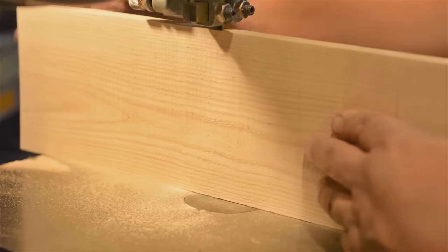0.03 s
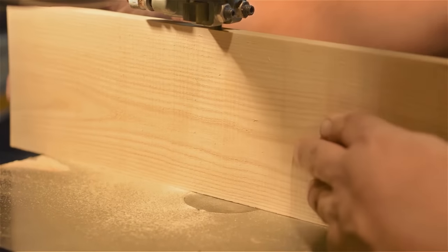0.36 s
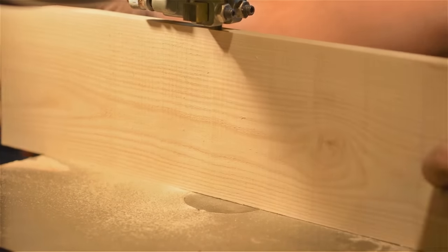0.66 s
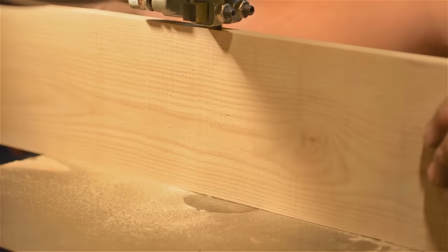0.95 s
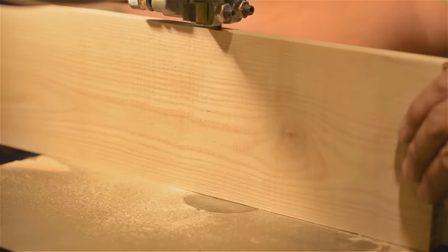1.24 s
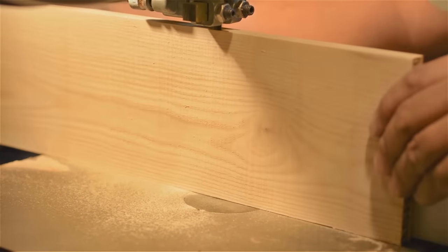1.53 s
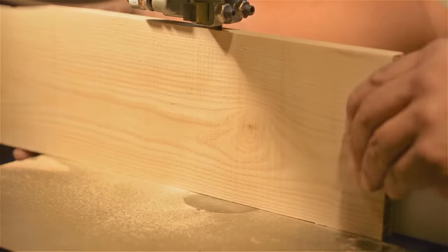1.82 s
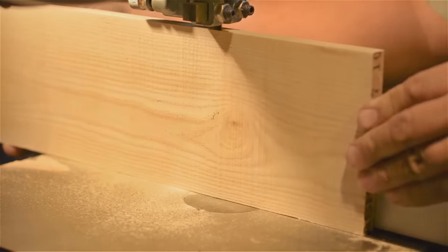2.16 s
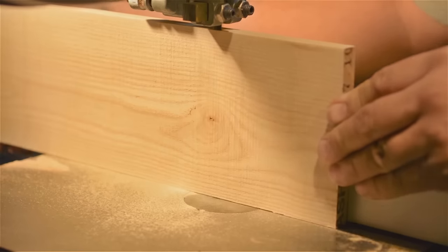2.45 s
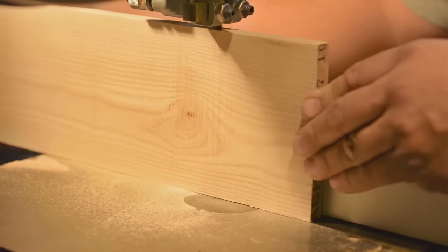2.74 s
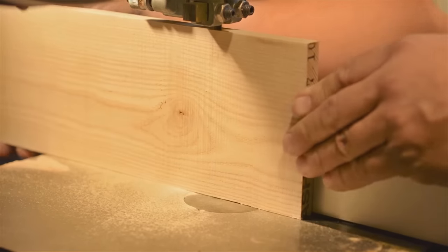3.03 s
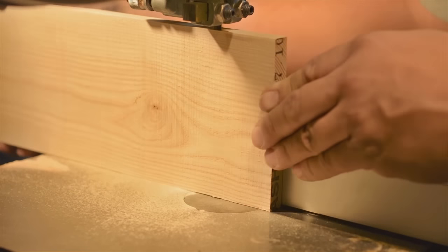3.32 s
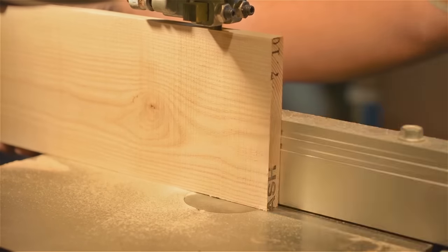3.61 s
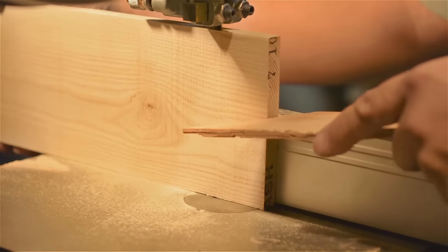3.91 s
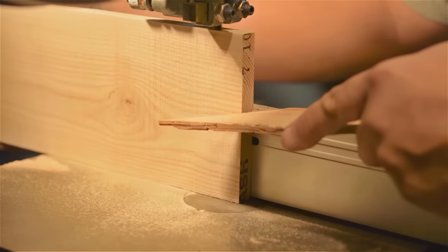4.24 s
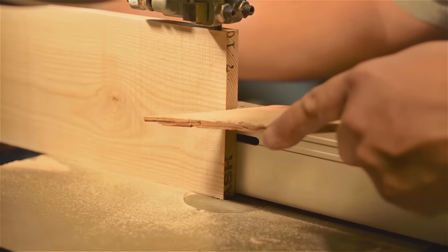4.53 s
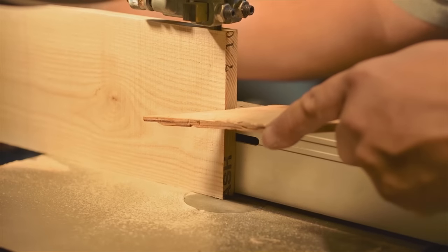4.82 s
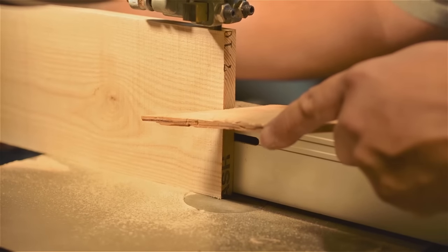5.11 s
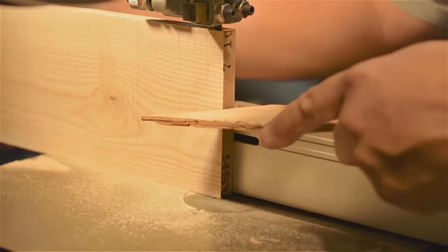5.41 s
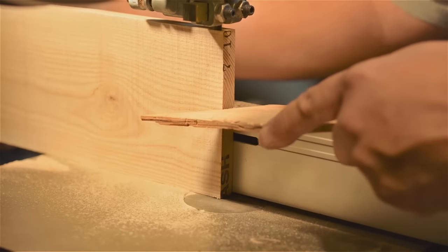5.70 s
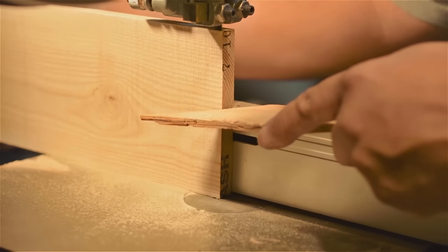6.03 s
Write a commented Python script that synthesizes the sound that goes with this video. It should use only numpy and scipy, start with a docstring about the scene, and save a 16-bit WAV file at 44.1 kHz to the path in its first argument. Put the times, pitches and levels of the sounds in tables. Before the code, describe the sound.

Close to a workshop bandsaw, a fast-forwarded cut makes a high, sizzling hiss broken by shrill chirps and a faint rattle of the board. A thin whistle comes through as the pressure lets up. Near the end the pitch suddenly falls to real speed, and the blade goes on rasping through the wood with pulsing metallic ringing and brief squeals over the motor's hum.

```python
"""Bandsaw, fast then slow

Close on a bandsaw resawing a pine board in a workshop, one microphone, dead centre. The motor hums,
the teeth rasp, and the steel band rings and chatters in the kerf. At first it plays six times too
fast: a high hiss with chirps that thin out when the hand stops feeding. Then it drops to true speed."""
import sys
import numpy as np
from scipy import signal
from scipy.fft import rfft, irfft, next_fast_len
from scipy.io import wavfile
from scipy.ndimage import uniform_filter1d, minimum_filter1d

SR = 44100
rng = np.random.default_rng(int(sys.argv[2]) if len(sys.argv) > 2 else 0)


def to_wav(s):
    """Save 16-bit WAV."""
    ch = np.atleast_2d(s).T  # columns
    pcm = np.round(np.clip(ch, -1, 1) * 32767)  # PCM
    wavfile.write(sys.argv[1], SR, pcm.astype(np.int16))


N = 267246
SWITCH_S, FAST_PACE = 4.615, 6  # pace multiplies true-speed frequencies and rates


def amp(db):
    """Decibels to amplitude."""
    return 10 ** (np.asarray(db) / 20)


def unit(x):
    """Scales to an rms of one."""
    return x / np.sqrt(np.mean(abs(x) ** 2) + 1e-20)


def curves(rows, t):
    """The columns of a table, joined by straight lines in time."""
    times, *columns = np.transpose(rows)
    return [np.interp(t, times, column) for column in columns]


def spells(rows, t, rest, attack_s, release_s):
    """Controls that leave their resting values for those of each event, hold, and return."""
    values = np.outer(rest, np.ones(len(t)))
    for start, length, *held in rows:
        rise = np.clip((t - start) / attack_s + .5, 0, 1)
        fall = np.clip((start + length - t) / release_s + .5, 0, 1)
        values += rise * fall * (np.array(held)[:, None] - values)
    return values


def slope(points, hz):
    """Gain of a spectrum given as points on a log axis."""
    f, db = np.transpose(points)
    return amp(np.interp(np.log(hz + 1), np.log(f + 1), db))


def peaks(modes, hz):
    """Gain of a set of steep-sided resonances."""
    return np.sqrt(sum((amp(db) / (1 + ((hz - f) / width * 2.27) ** 2)) ** 2 for f, width, db in modes))


def coloured(x, gain):
    """Filters a sound by the spectrum gain(Hz)."""
    size = next_fast_len(len(x))
    return irfft(rfft(x, size) * gain(np.fft.rfftfreq(size, 1 / SR)), size)[:len(x)]


def noise(gain, t):
    """Complex noise of rms one, with the spectrum gain(Hz)."""
    size = next_fast_len(len(t))
    hz = np.arange(size // 2) * SR / size
    white = rng.standard_normal(len(hz)) + 1j * rng.standard_normal(len(hz))
    return unit(np.fft.ifft(white * gain(hz), size)[:len(t)])


def wander(t, rate_hz):
    """Random drift of rms one, up to about the given rate."""
    return unit(noise(lambda hz: 1 / (1 + (hz / rate_hz) ** 4), t).real)


def lap(t, pace, lap_hz=6.3, crest_s=1.803):
    """+1 to -1 and back, once for each lap of the band."""
    return np.cos(2 * np.pi * lap_hz * pace * (t - crest_s))


def whistle(t, hz, width_hz, steady=.26):
    """A fuzzy friction tone that follows a pitch curve."""
    a, b = (noise(lambda f: 1 / (1 + (f / width_hz) ** 2), t).real for _ in range(2))
    fuzz = a + 1j * b  # wandering size and phase of the swing
    fuzz /= (abs(fuzz) + .65) ** steady
    cycles = np.cumsum(hz * np.ones(len(t))) / SR
    return unit((fuzz * np.exp(2j * np.pi * cycles)).real)


def machine(t, pace, air_db, hum_db, waver=.00081):
    """Whirr of wheels and belt under the slightly wavering motor tones."""
    # whirr spectrum at true speed: f/Hz, relative level/dB
    whirr = [(10, -28.5), (100, -20.5), (150, -16.5), (180, -3.5), (240, -4.5), (322, -9.5), (350, -3.5),
             (410, 1.5), (437, 5.5), (475, -1), (900, -4), (1600, 2.5), (2000, 0), (9000, -22)]
    # motor and wheel tones at true speed: f/Hz, relative level/dB
    tones = [(355.1, 0.5), (711, -1), (532, -6)]
    air = unit(noise(lambda hz: slope(whirr, hz / pace), t).real)
    motor_s = np.cumsum(pace * (1 + waver * wander(t, 2 * pace))) / SR
    hum = sum(amp(db + 2 * wander(t, 3 * pace)) * np.sin(2 * np.pi * (hz * motor_s + rng.random()))
              for hz, db in tones)
    return amp(air_db) * air + amp(hum_db) * unit(hum)


def rasp(t, pace, grain_db, grain_hz):
    """Teeth tear fibres in uneven bites and stir the steel."""
    # spectrum of tearing wood at true speed: f/Hz, relative level/dB
    fibres = [(100, -26), (340, -23.5), (500, -2.5), (900, -4.5), (1200, -4), (1450, -1), (1750, -4.5),
              (2400, 3), (3200, -4.5), (4000, -1), (5400, -6), (6000, -9.5), (10500, -16), (12000, -28)]
    # resonances that every tooth stirs: f/Hz, width/Hz, relative level/dB
    steel = [(1942, 16, 10), (2020, 33, 5), (2754, 47, 7.5), (2978, 57, 5.5), (3380, 230, 2.5),
             (3673, 51, 8), (3900, 77, -0.5), (5460, 150, -2), (7180, 130, -4.5), (8400, 80, -22)]
    tearing = unit(noise(lambda hz: np.hypot(slope(fibres, hz / pace), peaks(steel, hz / pace)), t).real)
    return tearing * unit(amp(grain_db * wander(t, grain_hz * pace)))


def hollow(x, pace):
    """Echoes off table and fence cancel or add at the microphone."""
    # narrow notches and two lifts at true speed: f/Hz, width/Hz, gain/dB
    bands = [(188, 8.8, -11.5), (322, 6.7, 0), (434.5, 10.6, -19), (550, 2.9, -15), (618, 12, -7),
             (693.6, 10.6, -6), (870, 15, -1.5), (1367, 32, -6), (1485, 27, -6.5), (1983, 44, 4),
             (3030, 50, 3.5), (4420, 98, -8), (5080, 87, -3.5), (5600, 120, -2)]
    return coloured(x, lambda hz: amp(sum(db * np.exp(-((hz / pace - f) / width) ** 2)
                                          for f, width, db in bands)))


def high_ring(t, pace, feed, eased_db=-9):
    """The high friction tone: a focused whistle when the band bites hard, else a broad sizzle."""
    # the band rings out: t/s, length/s, relative level/dB, f/Hz as heard, focus/0-1
    rings = [(0, 0.3, -33, 10540, 0.5), (.44, 0.21, -36.5, 10450, 0.06), (.8, 0.26, -35.5, 10480, .2),
             (1.2, .2, -37, 10190, 0.7), (1.4, 0.45, -35.5, 10190, 1), (2.46, 0.079, -33, 9990, 0.3),
             (2.58, .14, -33.5, 10010, .5), (3.09, .065, -31, 10500, 0.32), (3.17, 0.15, -37, 9900, 0.2),
             (3.38, 0.0497, -37, 9470, 1), (3.92, 0.073, -24, 10100, .3), (4.06, 0.13, -33.5, 10060, 0.9),
             (4.22, .26, -32, 10070, 1), (4.5, .13, -34, 10250, 0)]
    db, hz, focus = spells(rings, t, rest=[-40, 10330, .15], attack_s=.044, release_s=.035)
    core = whistle(t, hz + 70 * wander(t, 14 * pace), width_hz=105, steady=.35)
    skirt = whistle(t, hz, width_hz=520, steady=.1)
    tone = focus * core + np.sqrt(abs(1 - focus ** 2)) * skirt
    lap_swell = amp(1.64 * focus * lap(t, pace))
    return amp(db + eased_db * (1 - feed)) * unit(tone * lap_swell)


def chatter_controls(t, feed, bite_hz=285.4, sag_s=.016, unloaded_hz=7560):
    """Each spell of chatter starts sharp and sags under load; the pitch rises as the feed eases."""
    # chatter in the kerf: t/s, length/s, level/dB, f/Hz as heard, core over skirt/dB, judder/dB
    chatters = [(.252, 0.03, -35, 6900, -6, -56), (0.321, 0.1, -38, 6650, -9, -59),
                (0.459, 0.082, -37.5, 6510, 0, -56.5), (0.579, 0.061, -34.5, 6480, -4, -54.5),
                (0.84, .385, -36.5, 6590, -0.5, -61.5), (1.253, .57, -34, 6570, 0, -59.5),
                (2.073, 0.088, -30, 6540, 1, -51), (2.167, .225, -31.5, 6520, 0, -55),
                (2.415, 0.053, -32.5, 6380, -6, -57.5), (2.519, 0.06, -32.5, 6310, -17, -55),
                (2.625, 0.018, -34.5, 6400, -10, -56), (2.675, 0.19, -33, 6440, -4, -59),
                (2.872, 0.045, -35.5, 6360, -9, -56), (3.089, .016, -30, 6670, -8, -60),
                (3.119, 0.12, -33, 6400, -2, -54.5), (3.296, 0.0325, -31, 6280, -2, -52.5),
                (3.365, 0.0365, -30, 6250, -2, -52), (3.436, .045, -36, 6700, -4, -69),
                (3.969, 0.11, -34, 6460, -3, -56.5), (4.116, 0.19, -36.5, 6590, -6, -58.5),
                (4.335, 0.083, -37.5, 6350, -7, -58.5), (4.455, 0.11, -38, 6680, 5, -62)]
    db, hz, core_db, judder_db = spells(chatters, t, rest=[-45.5, 6520, -9, -69],
                                        attack_s=.0035, release_s=.013)
    bite = sum((t >= start) * np.exp(-abs(t - start) / sag_s) for start, *_ in chatters)
    pitch_hz = feed * (hz + bite_hz * bite) + (1 - feed) * unloaded_hz
    return db, pitch_hz, core_db, judder_db


def chatter(t, pace, feed, hz, core_db, bend_hz=110, waver_hz=90):
    """The low friction tone: a focused core, and a rough skirt that each lap bends in pitch."""
    # frame resonances that radiate the skirt, at true speed: f/Hz, width/Hz, relative level/dB
    frame = [(1096, 25, 8.5), (987.5, 20.3, 8), (1003, 20, 12.5), (1074, 29, 3.5), (1180, 50, 3),
             (1230, 43, -8)]
    bent_hz = hz + feed * bend_hz * lap(t, pace) + waver_hz * wander(t, 16 * pace)
    rough = whistle(t, bent_hz, width_hz=670, steady=.47)
    skirt = unit(coloured(rough, lambda f: peaks(frame, f / pace)))
    core = whistle(t, hz, width_hz=35, steady=.5)
    tone = skirt + amp(core_db) * core
    return tone / np.sqrt(uniform_filter1d(tone ** 2, size=900) + 1e-9)  # the swing saturates


def knocks(t, pace, per_s=190, spread_db=4.5, lap_db=1):
    """The board rattles on the table: dull bumps of random size."""
    # spectrum of a bump at true speed: f/Hz, relative level/dB
    thud = [(4, 10), (60, 7.5), (130, 7), (260, -16), (600, -45)]
    bite = np.clip(wander(t, 9 * pace), -2, 1.5)
    sizes = rng.standard_normal(len(t)) * amp(spread_db * bite - lap_db * lap(t, pace))
    bumps = sizes * (rng.random(len(t)) < per_s * pace / SR)
    return unit(coloured(bumps, lambda hz: slope(thud, hz / pace)))


def judder(t, pace, judder_db, feed, eased_db=-8, decay_s=.011):
    """The board shakes with the chatter, jolts when it catches, and settles when the feed eases."""
    # the board catches: t/s, level/dB
    catches = [(.265, -47), (1.765, -49), (1.803, -48.5), (2.085, -48), (2.2, -49), (3.305, -47)]
    jolts = sum(amp(db) * (t >= s) * np.exp(-abs(t - s) / decay_s) for s, db in catches)
    return np.hypot(amp(judder_db + eased_db * (1 - feed)), jolts) * knocks(t, pace)


def squeaks(t):
    """Wood pinches the band for a moment."""
    # pinches: t/s, length/s, f/Hz as heard, level/dB
    pinches = [(1.054, 0.43, 3940, -52), (2.737, 0.113, 3230, -48), (3.255, 0.083, 5080, -46),
               (3.292, 0.045, 3120, -47), (3.363, 0.075, 3170, -42)]
    out = np.zeros(len(t))
    for start, length, hz, db in pinches:
        during = (t >= start) & (t < start + length)
        fade = signal.windows.tukey(during.sum(), .5)
        out[during] += amp(db) * whistle(t[during], hz, width_hz=34) * fade
    return out


def free_band(t):
    """A thin whistle that rises as the band unloads."""
    # the band sings, free of the feed: t/s, f/Hz as heard, level/dB
    song = [(3.47, 7020, -50), (3.55, 7440, -47), (3.68, 7450, -40), (3.83, 7470, -40), (3.92, 7420, -39),
            (4.0, 7230, -54.5)]
    hz, db = curves(song, t)
    singing = (t > song[0][0]) & (t < song[-1][0])
    return amp(db) * whistle(t, hz, width_hz=60, steady=.1) * singing


def sped_up(t, pace):
    """Several pushes of the board; within each lap the band swings between chatter and ring."""
    # the hand eases off between pushes: t/s, length/s, ease/0-1
    pauses = [(.045, 0.19, .85), (.69, 0.17, .92), (1.875, 0.19, 0.91), (2.48, 0.2, 0.19),
              (2.965, .15, .95), (3.27, 0.052, 0.1), (3.53, 0.44, 0.81)]
    # loudness of the teeth: t/s, relative level/dB
    rasp_levels = [(0.0, -45), (0.19, -41), (0.34, -49), (0.82, -42.5), (0.95, -49), (1.86, -46),
                   (1.88, -46), (2.01, -35.5), (2.14, -50), (2.65, -42), (2.77, -48), (3.09, -42),
                   (3.2, -46.5), (3.29, -41), (3.33, -45), (3.71, -42), (4.53, -47), (4.6, -45.5)]
    ease, = spells(pauses, t, rest=[0], attack_s=.055, release_s=.09)
    feed = 1 - ease
    swing = feed * .5 * (lap(t, pace) + wander(t, 9 * pace))
    chatter_db, chatter_hz, core_db, judder_db = chatter_controls(t, feed)
    chatter_swell = unit(amp(-5 * np.maximum(swing, -.4)))
    low_tone = amp(chatter_db) * chatter(t, pace, feed, chatter_hz, core_db) * chatter_swell
    high_tone = high_ring(t, pace, feed) * unit(amp(3.5 * swing))
    rasp_db, = curves(rasp_levels, t)
    teeth = amp(rasp_db + 12.5 - 3.9 * ease) * rasp(t, pace, grain_db=1.5, grain_hz=45)
    # the machine stands out when the feed eases
    motor = machine(t, pace, air_db=-38 + 8.5 * ease, hum_db=-51.1 + 11.6 * ease, waver=.001235)
    saw = hollow(teeth + motor, pace) * unit(amp(.91 * wander(t, 3 * pace)))  # the hand pushes unevenly
    return low_tone + high_tone + saw + judder(t, pace, judder_db, feed) + free_band(t) + squeaks(t)


def vibration(modes, t, steady):
    """Friction feeds the band's modes; their swing saturates, so it is steadier than noise."""
    swing = noise(lambda hz: peaks(modes, hz), t)
    return unit(swing.real / (abs(swing) + .14) ** steady)


def band_ring(t):
    """The steel band rings in the kerf at true speed, swelling about once a lap."""
    # resonances of the band: f/Hz, width/Hz, relative level/dB
    modes = [(1692.5, 40, -2), (1647, 53, -3), (1690, 31, -19), (1798, 48, -5), (1936, 25, -4.5)]
    # the ring swells: t/s, length/s, relative level/dB
    swells = [(4.6, 0.021, -28), (4.705, 0.034, -28.5), (4.785, .1, -29), (4.94, 0.039, -34.5),
              (5.1, 0.077, -31), (5.275, 0.064, -28.5), (5.44, .075, -27), (5.7, 0.097, -31.5),
              (5.92, 0.032, -28), (5.985, .025, -33)]
    db, = spells(swells, t, rest=[-35], attack_s=.03, release_s=.021)
    return amp(db + 2.4) * vibration(modes, t, steady=.1) * unit(amp(1.5 * wander(t, 48)))


def band_squeal(t, rest_db=-41):
    """The band breaks into a higher squeal; returns the sound and its rise over rest in dB."""
    # resonances of the squeal: f/Hz, width/Hz, relative level/dB
    modes = [(2240, 130, 3), (2090, 120, -5), (2390, 120, -8.5), (1155, 137, -4), (3314, 110, -8.5),
             (4530, 76, -9)]
    # bursts of squeal: t/s, length/s, level/dB
    bursts = [(4.6, 0.033, -26.5), (4.955, 0.066, -27.5), (5.035, 0.12, -26), (5.385, 0.058, -31),
              (5.545, 0.029, -30), (5.805, 0.043, -26), (5.99, 0.036, -25)]
    db, = spells(bursts, t, rest=[rest_db], attack_s=.013, release_s=.028)
    return amp(db) * vibration(modes, t, steady=.29), db - rest_db


def true_speed(t, pace=1):
    """Steady cutting; the board shakes harder as the squeal grows."""
    # loudness of the teeth: t/s, relative level/dB
    rasp_levels = [(4.63, -35.5), (5.108, -33.5), (5.222, -39.5), (5.286, -35.5), (5.736, -36),
                   (5.812, -33.5), (5.856, -37.5), (6.006, -33.5), (6.05, -39)]
    ring = band_ring(t)
    squeal, rise_db = band_squeal(t)
    rasp_db, = curves(rasp_levels, t)
    teeth = amp(rasp_db + 3.5) * rasp(t, pace, grain_db=.5, grain_hz=90)
    motor = machine(t, pace, air_db=-37, hum_db=-46.5)
    board = amp(-70.5 + .75 * rise_db) * knocks(t, pace)
    return ring + squeal + hollow(teeth + motor, pace) + board


def scene():
    """The speed drops abruptly; the saw sits dead centre."""
    t = np.arange(N) / SR
    saw = np.concatenate([sped_up(t[t < SWITCH_S], FAST_PACE), true_speed(t[t >= SWITCH_S])])
    return np.array([saw, saw])


def record(dry):
    """After the microphone, a fast limiter holds the peaks and a steep filter cuts the top treble."""
    ceiling_db, edge_hz = -18, 11850
    gain = np.minimum(1, amp(ceiling_db) / (abs(dry).max(0) + 1e-9))
    held = dry * uniform_filter1d(minimum_filter1d(gain, size=41), size=41)
    lowpass = signal.firwin(601, edge_hz, window=("kaiser", 9), fs=SR)
    return signal.oaconvolve(held, lowpass[None], "same")


dry = scene()
out = record(dry)
to_wav(out)
```